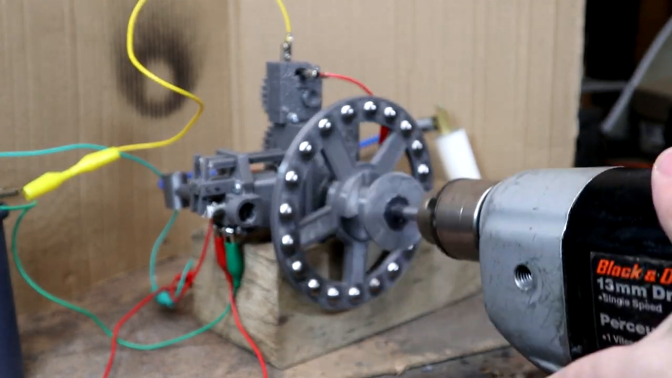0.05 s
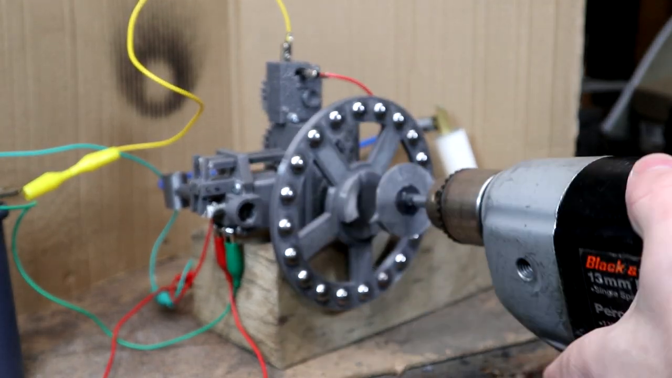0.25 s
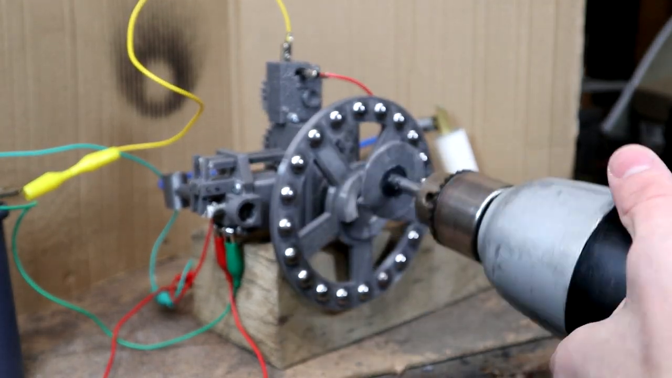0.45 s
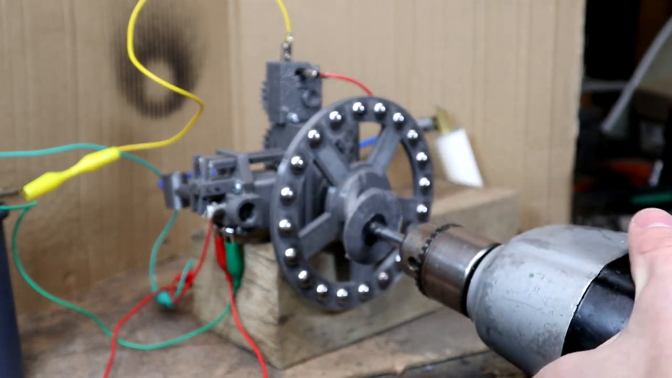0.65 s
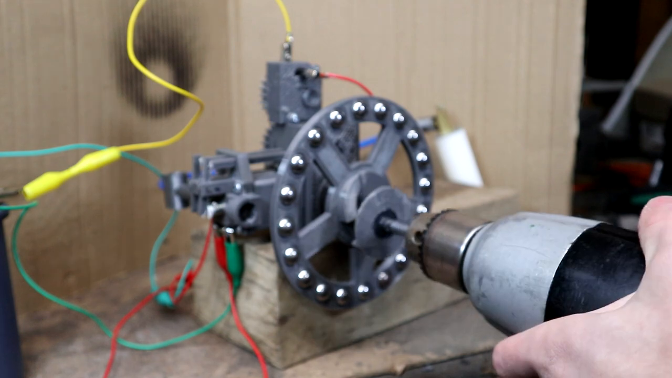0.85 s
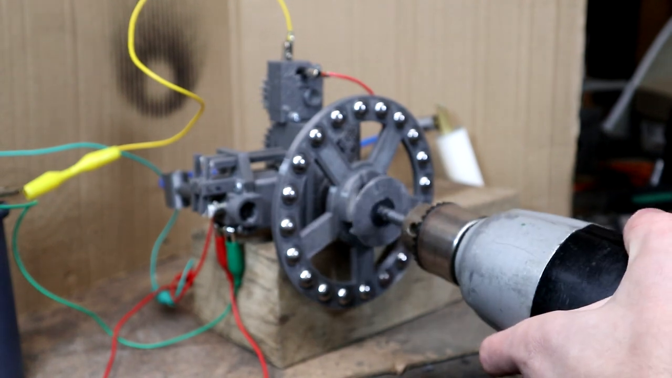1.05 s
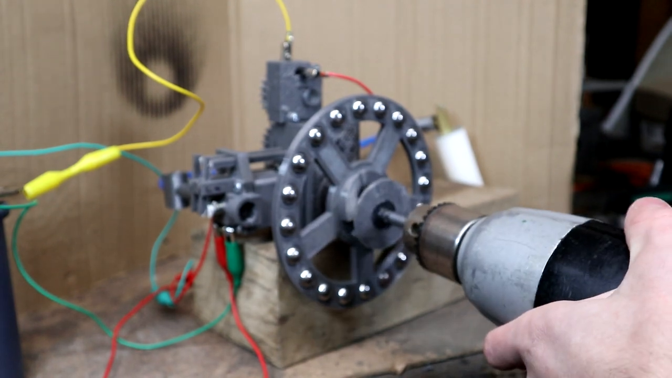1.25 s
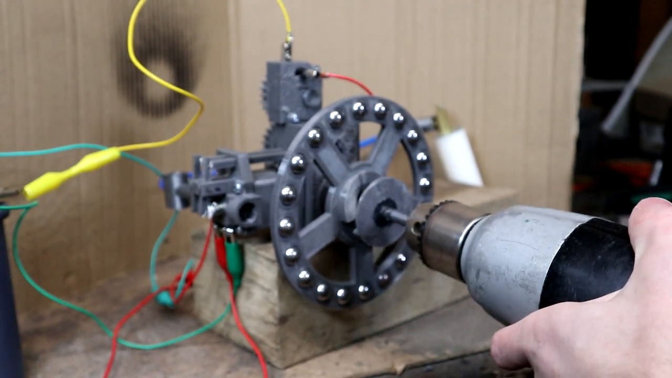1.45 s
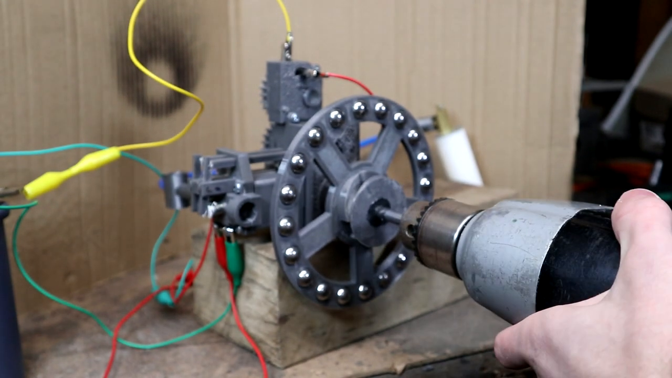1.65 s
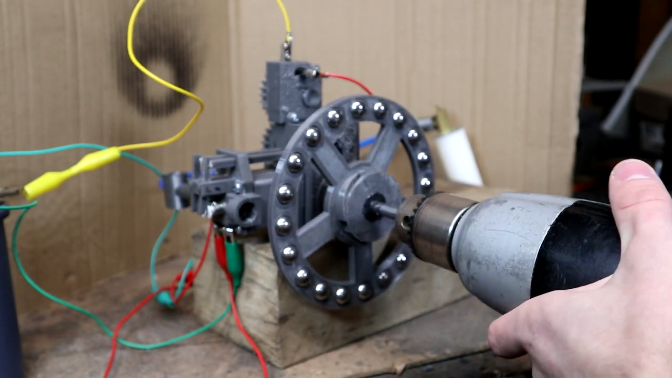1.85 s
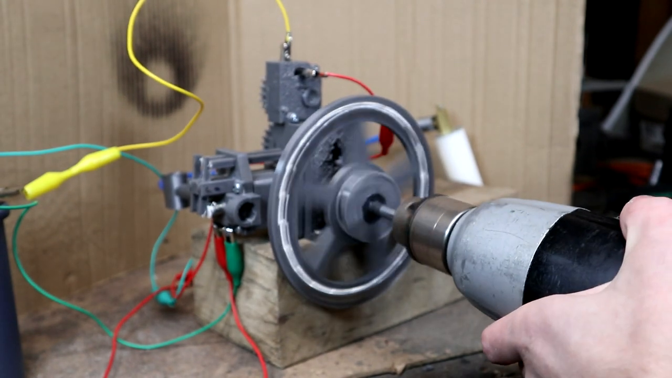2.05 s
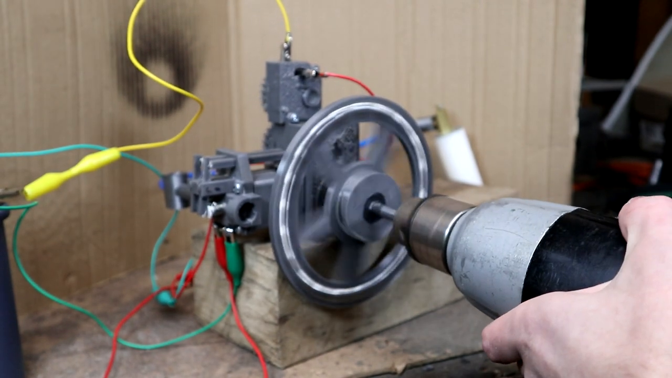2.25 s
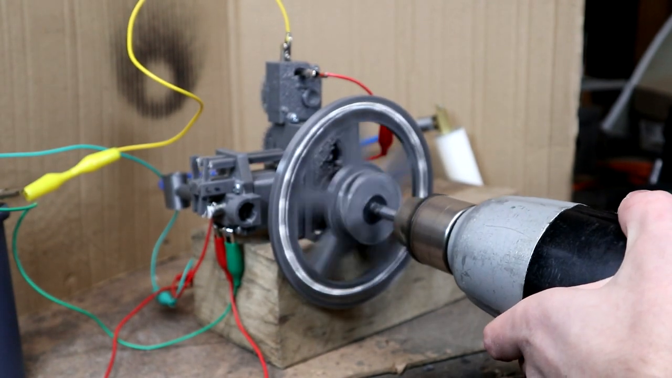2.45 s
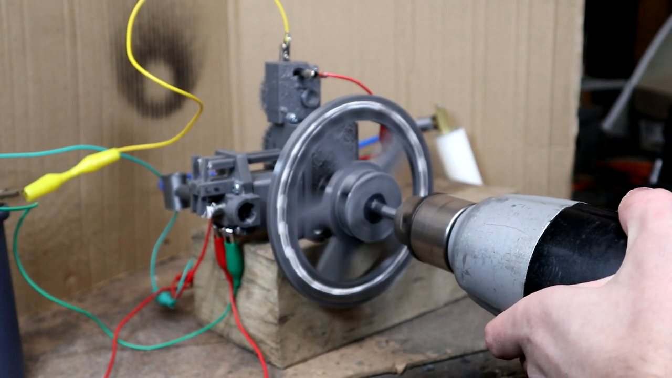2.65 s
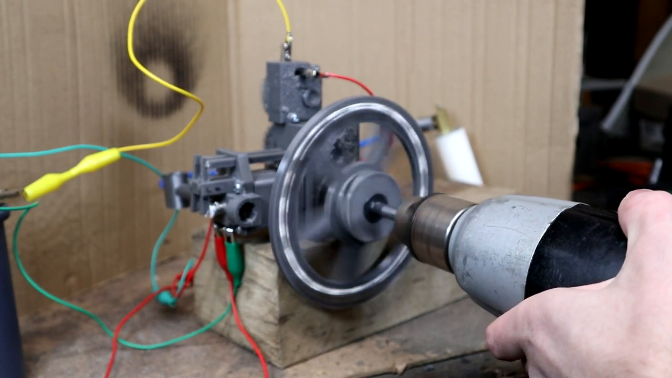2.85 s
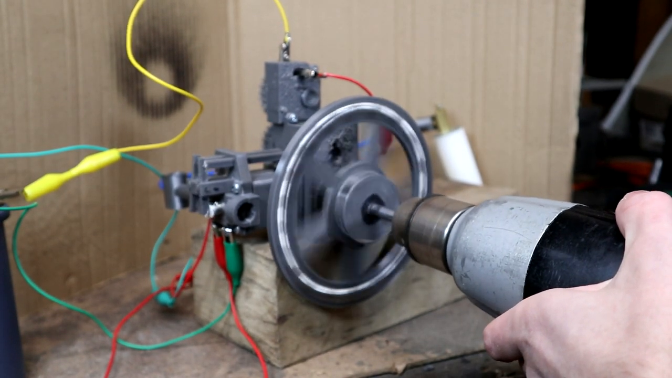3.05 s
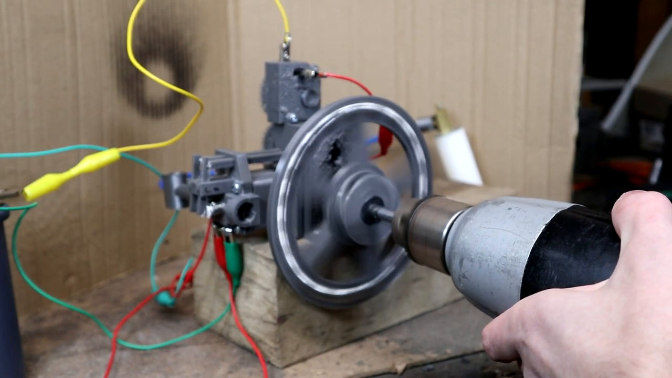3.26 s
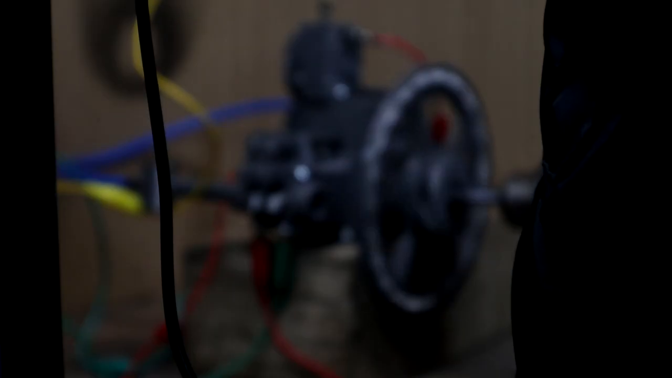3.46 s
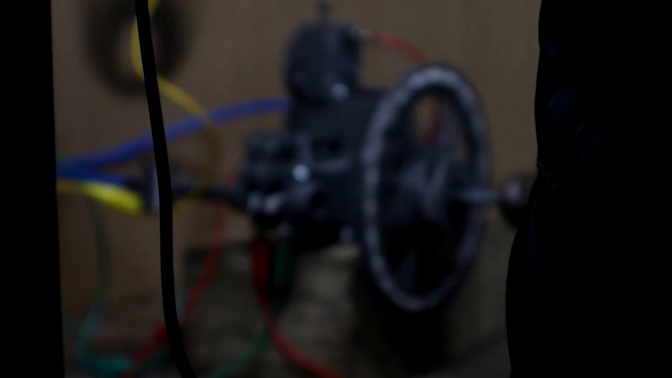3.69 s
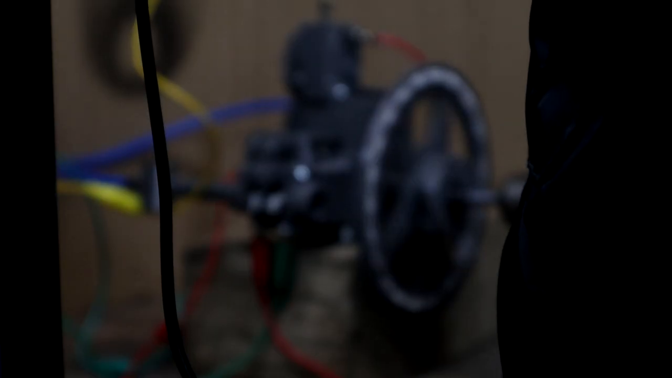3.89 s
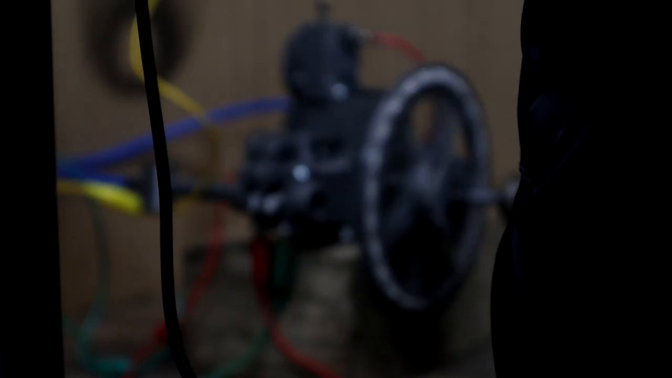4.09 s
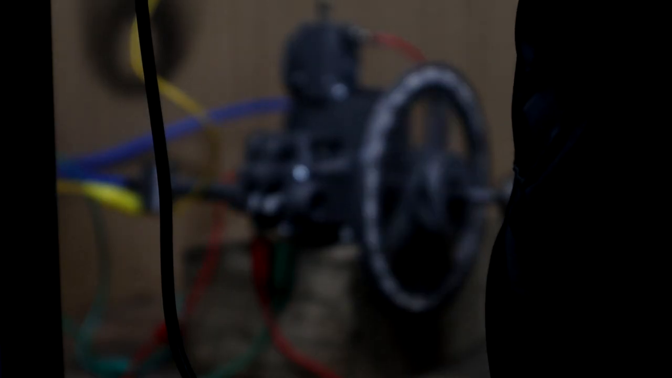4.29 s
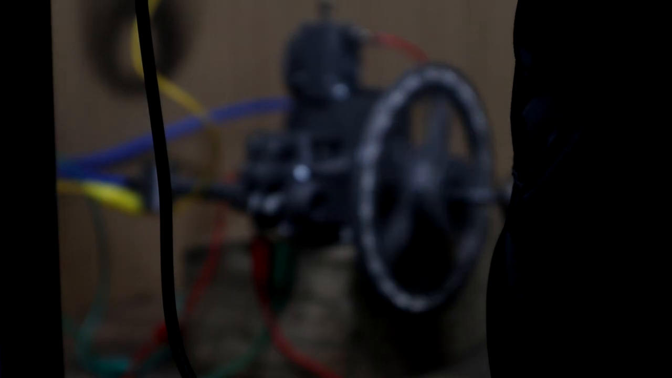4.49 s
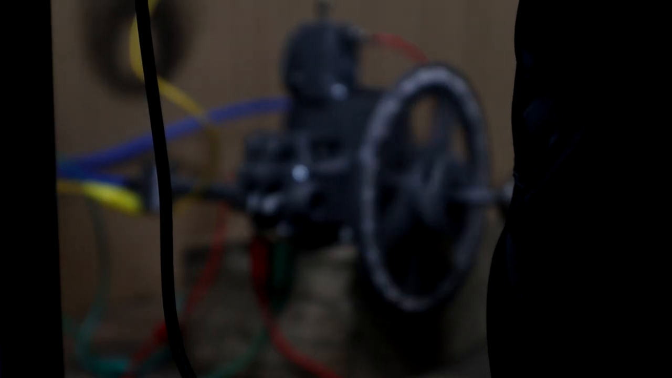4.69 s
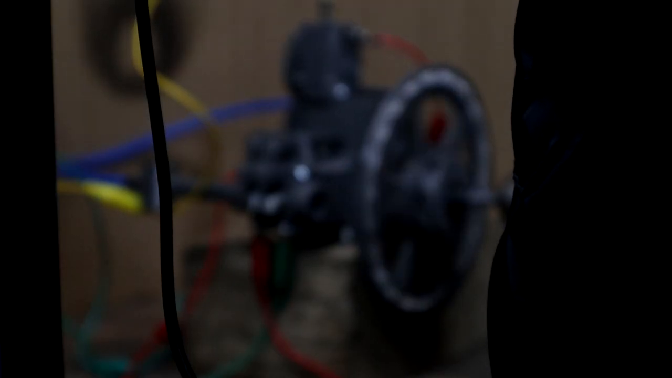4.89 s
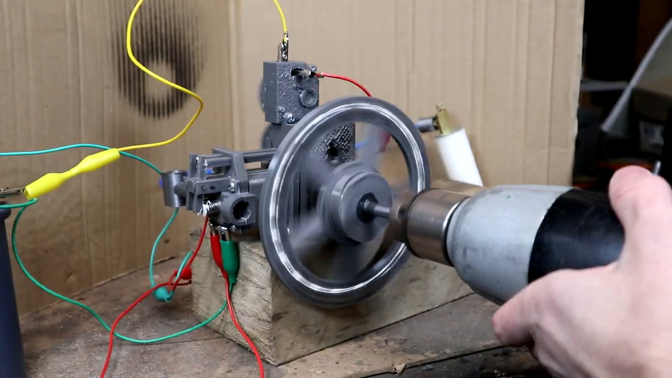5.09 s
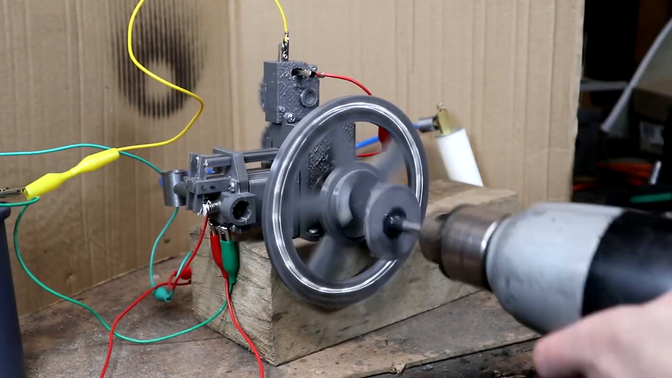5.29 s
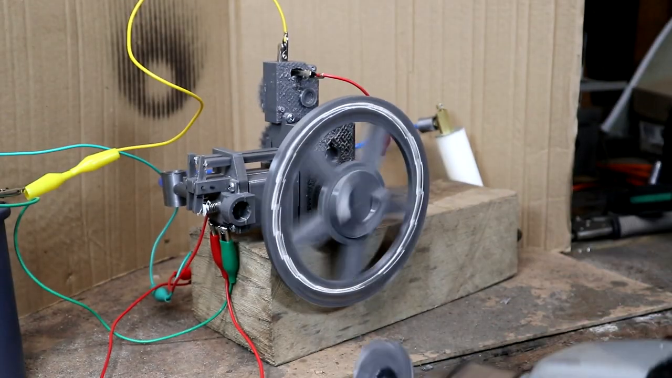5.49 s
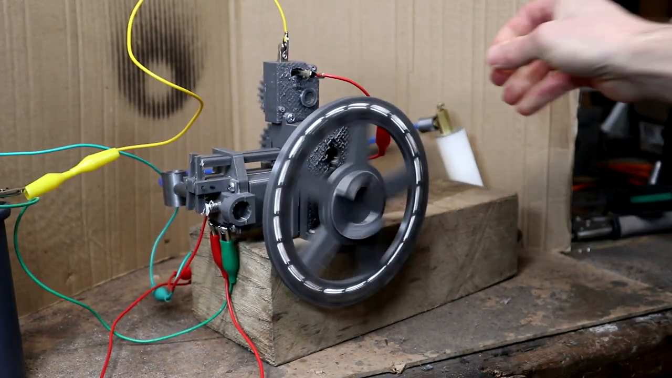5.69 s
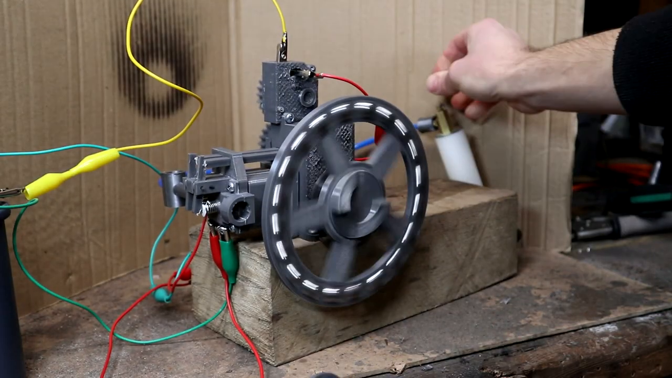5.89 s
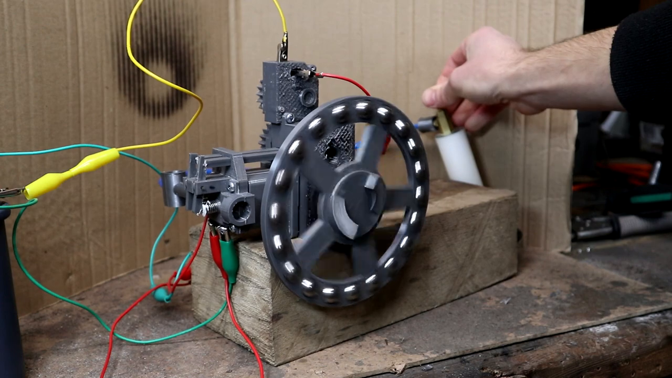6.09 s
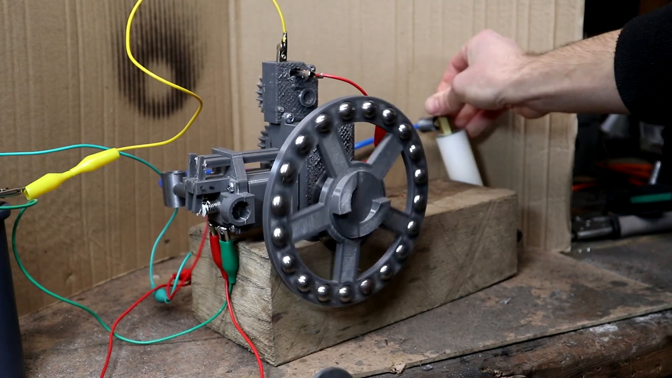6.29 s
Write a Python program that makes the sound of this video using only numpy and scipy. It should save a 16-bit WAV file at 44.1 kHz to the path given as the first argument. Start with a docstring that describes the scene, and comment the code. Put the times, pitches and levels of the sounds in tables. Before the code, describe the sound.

A power drill coasts down to a stop, pauses, then whines up to crank a small engine, heard close, then duller, then close and slowing.

```python
"""A hand drill coasts almost to rest, pauses, then spins up to crank a small model engine on a wooden block, and slows.
Gear teeth and commutator bars whine as sines at multiples of the shaft speed; knocks, rattle, grind and fan rush
are filtered noise that follows the speed. The microphone ports are near, but the middle stretch is heard from
farther off, where it is duller. Mains hum, a faint drone and whistle, room hush, small ticks and soft rubs and
rustles (the drill's last rub as it stops, then hands shifting) fill the workshop."""
import sys
import numpy as np
from scipy import signal
from scipy.fft import rfft, irfft, next_fast_len
from scipy.io import wavfile
from scipy.ndimage import map_coordinates

SR = 44100
rng = np.random.default_rng(int(sys.argv[2]) if len(sys.argv) > 2 else 0)


def natural_amplitude(level_db):
    """Convert a level in decibels to a linear amplitude factor, elementwise."""
    exponent = np.asarray(level_db, float) / 20
    return 10 ** exponent


def output_pcm(signal):
    """Save a mono or channel-first signal as 16-bit PCM at the path in sys.argv[1].

    Samples are clipped to [-1, 1] before scaling.
    """
    pcm = np.clip(np.atleast_2d(signal).T, -1, 1) * 32767
    wavfile.write(sys.argv[1], SR, np.round(pcm).astype(np.int16))


N = 279594
T = np.arange(N) / SR  # time [s]


def unit(x):
    """Scaled to rms 1."""
    return x / np.sqrt(np.mean(x ** 2) + 1e-20)


def along(points, hz, column=1):
    """A column of (frequency, ..) points read on a log frequency axis."""
    p = np.transpose(points)
    return np.interp(np.log(hz + 1), np.log(p[0] + 1), p[column])


def during(start, end, rise_s, fall_s):
    """1 between start and end, with a linear fade outside each."""
    return np.clip(np.minimum((T - start) / rise_s, (end - T) / fall_s) + 1, 0, 1)


def wobble(rate):
    """A smooth random curve, rate knots a second."""
    knots = rng.standard_normal(int(N * rate / SR) + 4)
    return map_coordinates(knots, [np.arange(N) * rate / SR])


def filtered(x, response):
    """x times a complex response of frequency."""
    m = next_fast_len(N + 8192)
    return irfft(rfft(x, m) * response(np.fft.rfftfreq(m, 1 / SR)), m)[..., :N]


def rings(modes, hz):
    """Causal sum of (frequency, width, level) resonances."""
    return sum(natural_amplitude(db) * 1j * hz * w / (c * c - hz * hz + 1j * hz * w) for c, w, db in modes)


def motor(start, end, first_hz, full_hz, let_go):
    """Whine base [Hz], speeding-up [10 kHz/s] and grip [0-1]: the rotor leaps, then drags the flywheel up; it coasts
    against air drag and dry friction."""
    quick_share, quick_s, slow_s = .681, .109, .34
    drag_per_s, friction_hz_per_s = .384, 669
    slack_s, bite_s = .028, .028
    driven_s = np.clip(T, start, let_go) - start
    coast_s = np.clip(T, let_go, end) - let_go
    lag = quick_share * np.exp(-driven_s / quick_s) + (1 - quick_share) * np.exp(-driven_s / slow_s)
    hz = full_hz - (full_hz - first_hz) * lag
    balance_hz = friction_hz_per_s / drag_per_s
    hz = (hz + balance_hz) * np.exp(-drag_per_s * coast_s) - balance_hz
    grip = np.clip((driven_s - slack_s) / bite_s, 0, 1) if first_hz == 0 else 1
    push = np.clip(np.gradient(hz) * SR / 1e4, 0, None)
    return hz, push, grip


# multiples of the whine base that sound: gear mesh, commutator, then three overtones
MULTIPLES = [2, 3, 4, 6, 8]
# phase unsteadiness of each whine [rad]
BLUR_RAD = [0.68, 0.4, 0.31, 0.87, .4]
# stretches of turning; the whine base is 4 times the shaft speed:
# (start [s], end [s], first whine base [Hz], full whine base [Hz], trigger let go [s])
RUNS = [(0, .6, 552, 552, .02), (2.018, 3.43, 0, 1607.5, 3.43), (3.44, 5.03, 1580, 1602, 5.03),
        (5.04, 6.34, 1628, 1613, 5.344)]
# base levels of each stretch, as the drill is heard there: (knock [dB], ring [dB], rattle [dB], grind [dB],
# rush [dB], gear mesh [dB], commutator [dB], overtones [dB])
HEARD = [(-56, -53.5, -30.5, -31, -37.5, -49, -29, -10.5), (-56.5, -49, -36, -34.5, -40.5, -37, -40, 2),
         (-66, -65.5, -45, -44.5, -49, -61, -40.5, -21), (-56.5, -48.5, -36, -34, -42, -39.5, -36, 1.5)]
# gear mesh strength over its own pitch: (frequency [Hz], level [dB])
MESH = [(450, -44), (600, -4.5), (740, -3), (850, -21.5), (1100, -17.5), (1400, -8.5), (1700, 1.5),
        (1950, -3.5), (2300, 5), (2900, -1), (3200, -0.5)]
# commutator strength over its own pitch: (frequency [Hz], level [dB])
BARS = [(800, -50), (1200, -25), (1650, -16.5), (2300, -10.5), (3000, -8), (3500, -5), (4200, -2),
        (4800, 0)]
# gain under acceleration: mesh, commutator [dB per 10 kHz/s]
CURRENT_DB = [3, 23]
# housing resonances lighting up each overtone: (frequency [Hz], width [Hz], level [dB])
LIT = [
    [(700, 170, -59.5), (2630, 570, -44.5), (3300, 230, -53), (6500, 550, -54.5)],
    [(2725, 700, -45), (3870, 400, -51), (6020, 320, -44), (6650, 230, -47)],
    [(2300, 500, -51), (6360, 730, -51)],
]
# the commutator swells in after each change of place: (time [s], level under [dB], time constant [s])
SWELL = [(3.439, 16, 0.17), (5.042, 19, 0.026)]


def whine():
    """Gear and commutator sines locked to the shaft, each unsteady in phase and strength; also the shaft angle."""
    out, shaft = np.zeros(N), np.zeros(N)
    swell_db = -sum((T >= s) * db * np.exp(-np.abs(T - s) / rise) for s, db, rise in SWELL)
    for run, (*_, mesh_db, bars_db, overtones_db) in zip(RUNS, HEARD):
        hz, push, grip = motor(*run)
        angle = 2 * np.pi * np.cumsum(hz) / SR
        on = during(*run[:2], 0.0013, 0.0024)
        shaft += on * angle / 4
        mesh = natural_amplitude(mesh_db + along(MESH, MULTIPLES[0] * hz) + CURRENT_DB[0] * push)
        bars = natural_amplitude(bars_db + along(BARS, MULTIPLES[1] * hz) + CURRENT_DB[1] * push + swell_db)
        settled = np.clip(2 - push / .3, 0, 1)  # teeth chatter and lose their overtones under hard acceleration
        gains = [mesh, bars]
        for k, modes in zip(MULTIPLES[2:], LIT):
            lit = sum(natural_amplitude(db) * np.exp(-2 * ((k * hz - c) / w) ** 2) for c, w, db in modes)
            gains.append(settled * natural_amplitude(overtones_db) * lit)
        for k, gain, blur in zip(MULTIPLES, gains, BLUR_RAD):
            flutter = 1 + .33 * wobble(35)
            drift = natural_amplitude(.6 * wobble(8) + 6 * push * wobble(70))  # rougher while speeding up
            phase = k * angle + blur * (wobble(60) + 2.1 * wobble(9))
            out += on * grip ** 4 * np.sqrt(2) * gain * drift * flutter * np.sin(phase)
    return out, shaft


# how knock, ring, rattle, grind and rush follow the whine base:
# (slope [dB per octave], dies below [Hz], gain under acceleration [dB per 10 kHz/s])
LAWS = [(1.5, 340, 13), (2.5, 140, -2), (11.5, 130, 11.5), (6.5, 90, 8.5), (4, 20, 1)]
# speeds that shake the block into ringing: (whine base [Hz], width [Hz], more ring [dB])
SHAKES = [(1090, 393, 12.5), (675, 300, 5.5), (200, 210, 3)]


def effort():
    """Gains of knock, ring, rattle, grind and rush: noise grows with speed and load and dies away at the end of
    each stretch."""
    full_hz, stop_db_per_s = 1600, 329
    free_fan_db = -21  # the fan already whirs while the teeth take up their slack
    gains = 0
    next_starts = [*np.transpose(RUNS)[0, 1:], N / SR + 1]
    for run, levels, until in zip(RUNS, HEARD, next_starts):
        hz, push, grip = motor(*run)
        hz = hz + 1
        db = np.array([full_db + slope * np.log2(hz / full_hz) - 20 * np.log10(1 + (dies_hz / hz) ** 4) + load_db * push
                       for full_db, (slope, dies_hz, load_db) in zip(levels, LAWS)])
        db[1] += sum(more_db * np.exp(-2 * ((hz - c) / w) ** 2) for c, w, more_db in SHAKES)
        after_s = np.clip(T - run[1], 0, None)
        drive = np.ones_like(db) * grip
        drive[-1] = np.maximum(drive[-1], natural_amplitude(free_fan_db))
        gains += during(run[0], until - .012, 0.01, 0.01) * drive * natural_amplitude(db - stop_db_per_s * after_s)
    return gains


def repeating(shaft, changes):
    """Surface flaws met once a turn: noise read by shaft angle, renewed `changes` times a second."""
    flaws = rng.standard_normal((int(N * changes / SR) + 4, 48))
    where = [np.arange(N) * changes / SR, shaft / (2 * np.pi) % 1 * flaws.shape[1]]
    return unit(map_coordinates(flaws, where, mode="grid-wrap"))


def contact(rate, db):
    """Two noises with one uneven strength, as of uneven contacts."""
    return rng.standard_normal((2, N)) * natural_amplitude(db * wobble(rate))


# housing and block: (frequency [Hz], width [Hz], level before mixing [dB])
BODY = [(596, 50, 8), (690, 48, -8.5), (1063, 30, 7.5), (1299, 40, 8), (1974, 27, -3), (2510, 110, -6),
        (3330, 73, -10.5)]


def body(hz):
    """Resonances of housing and block standing on a flat response."""
    return 1 + 0.37 * rings(BODY, hz)


# spectrum of the bench knocks: (frequency [Hz], relative level [dB])
KNOCK = [(29, -48.5), (50, -16.5), (129, -7), (192, -5.5), (340, -1), (440, -26), (750, -120)]
# the wooden block's strongest rings: (frequency [Hz], width [Hz], level before squaring [dB])
BLOCK = [(668, 99, 1), (549, 120, -4)]
# spectra of gear rattle, grind and fan rush, each near then far: (frequency [Hz], relative level [dB])
RATTLE = [
    [(190, -56), (330, -18.5), (389, -4.5), (595, -5.5), (646, -12), (762, 0), (843, -5.5), (1290, -1.5),
     (1500, -8), (1950, -34.5), (3300, -120)],
    [(190, -42), (330, -33), (394, -6), (541, -11.5), (626, -5.5), (827, 0.5), (927, -3.5), (1410, -9),
     (1500, -9.5), (1950, -27), (3300, -120)],
]
GRIND = [
    [(850, -44.5), (1450, 0.5), (1570, 1), (1730, 2.5), (2020, -0.5), (2130, 2.5), (2960, 4.5),
     (4600, -5.5), (5980, -14.5), (10100, -120)],
    [(850, -32), (1450, -6.5), (1800, 2.5), (2130, -5), (2450, -4.5), (3770, -6), (4430, -10), (4600, -39),
     (5980, -39), (10100, -120)],
]
RUSH = [
    [(2650, -30), (4500, -5.5), (6430, -2), (10500, -8), (11300, -11.5), (11700, -14), (11800, -27),
     (12300, -29.5), (16000, -72), (22000, -120)],
    [(2650, -49.5), (4500, -32), (4630, -10), (4960, -14), (5080, -12.5), (7000, -15), (8140, -21.5),
     (11200, -21.5), (12300, -31), (16000, -72), (22000, -120)],
]


def clatter(place, shaft):
    """Two unrelated draws of the noisy parts: knocks, block ring, rattle and grind in the body, air from the fan."""
    flaws = repeating(shaft, changes=45)
    each_turn = 1 + 0.071 * np.sin(shaft)
    knock = filtered(contact(30, 2.7), lambda hz: natural_amplitude(along(KNOCK, hz))) * natural_amplitude(1.7 * wobble(22))
    ring = filtered(contact(60, 2.0), lambda hz: rings(BLOCK, hz) ** 2)
    rattle = filtered(contact(400, 0.62) + 0.12 * flaws, lambda hz: natural_amplitude(along(RATTLE[place], hz)) * body(hz))
    grind = filtered(contact(600, 1.3) * each_turn + 0.3 * flaws,
                     lambda hz: natural_amplitude(along(GRIND[place], hz)) * body(hz))
    rush = filtered(contact(900, 1.24) * each_turn + 0.25 * flaws, lambda hz: natural_amplitude(along(RUSH[place], hz)))
    unsteady_db = [0.92 * wobble(6),
                   1.0 * wobble(9),
                   0.19 * wobble(17) + 0.72 * wobble(5.06),
                   0.31 * wobble(18) + 0.27 * wobble(6),
                   0.25 * wobble(11)]
    parts = [knock, ring, rattle, grind, rush]
    return sum(gain * natural_amplitude(db) * unit(x) for gain, db, x in zip(effort(), unsteady_db, parts))


# difference of the two microphone ports, near then far: (frequency [Hz], side over mid [dB])
APART = [
    [(60, -18.5), (120, -22), (220, -32.5), (440, -18), (840, -14), (1630, -11.5), (3160, -6.5),
     (6120, 0.5), (11800, 9)],
    [(60, -12), (120, 4), (220, -32), (440, -35), (840, -17.5), (1630, -17), (3160, -8.5), (6120, -1.5),
     (11800, 3.5)],
]
# part of that difference following the direct sound, near then far: (frequency [Hz], share [0-1], phase [rad])
DIRECT = [
    [(300, 0.7, -2), (1200, 0.9, -2.5), (3000, 0.6, -2), (6000, .6, -2), (11000, .6, -1.74)],
    [(300, 0.4, -2.5), (1200, 0.2, -12), (3400, 0, 2), (5860, 0, -0.3), (11000, .4, 2)],
]


def ports(tone, noise, place, tone_side_db):
    """Left and right ports: their difference is part phase-turned direct sound, part diffuse sound."""
    def share(hz):
        return np.clip(along(DIRECT[place], hz), 0, 1)

    def turn(hz):
        return natural_amplitude(along(APART[place], hz)) * np.exp(1j * along(DIRECT[place], hz, column=2))

    direct = filtered(noise[0], lambda hz: share(hz) * turn(hz))
    direct = direct + filtered(tone, turn) * natural_amplitude(tone_side_db)
    diffuse = filtered(noise[1], lambda hz: np.sqrt(1 - share(hz) ** 2) * turn(hz))
    mid, side = tone + noise[0], direct + diffuse
    return np.array([mid + side, mid - side])


# the listening place changes to far, then back to near: time [s]
SWAP_S = [3.432, 5.037]


def drill():
    """Whine and clatter from the near place, but far between the two changes; the drill dips out at each change."""
    tone, shaft = whine()
    inside = np.minimum(T - SWAP_S[0], SWAP_S[1] - T) / 0.007  # fade [s]
    near = ports(tone, clatter(0, shaft), 0, tone_side_db=1.5) * np.clip(-inside, 0, 1)
    far = ports(tone, clatter(1, shaft), 1, tone_side_db=-7.0) * np.clip(inside, 0, 1)
    return near + far


# mains hum, midway between the two ports: (time [s], level [dB])
HUM = [(0.0, -56), (0.33, -55), (0.94, -67), (1.77, -75.5), (2.05, -65), (2.9, -66), (3.23, -75),
       (3.49, -64), (5.76, -66), (6.11, -58), (6.34, -60)]


def mains_hum():
    """A sine at twice the mains frequency, unsteady in level and phase, slightly stronger on the left."""
    hum_hz = 120
    level_db = np.interp(T, *np.transpose(HUM)) + .8 * wobble(29)
    hum = np.sqrt(2) * natural_amplitude(level_db) * np.sin(2 * np.pi * hum_hz * T + .2 * wobble(7.3))
    return hum * natural_amplitude([[.6], [-.6]])


def drone_and_whistle():
    """A faint low drone and a thin fuzzy whistle: sines with wandering phase and level."""
    drone = natural_amplitude(-87 + 2.5 * wobble(37)) * np.sin(2 * np.pi * 203 * T + 0.87 * wobble(30))
    whistle = natural_amplitude(-93.5 + 5.0 * wobble(40)) * np.sin(2 * np.pi * 3960 * T + 1.2 * wobble(120))
    return drone + whistle * [[1.5], [.45]]


# soft rubs and rustles, the drill's last rub as it stops, then hands shifting:
# (time [s], soft rub level [dB], thin rustle level [dB])
RUBS = [(.65, -76, -71.5), (.78, -74, -75), (1.096, -76, -90), (1.2, -88, -99), (1.894, -78, -103)]


def rub_gains():
    """Gains of rub and rustle: each stroke swells fast and dies more slowly."""
    rise_db_per_s, fall_db_per_s = 250, 113
    return sum(natural_amplitude(np.c_[db] + np.minimum(rise_db_per_s * (T - s), fall_db_per_s * (s - T))) for s, *db in RUBS)


# spectrum of room hush and rub: (frequency [Hz], relative level [dB])
ROOM = [(15, -58), (25, -26.5), (59, -13.5), (121, -3), (174, -17.5), (3130, -34), (3950, -32),
        (4380, -37.5), (12000, -51), (15600, -86.5), (22000, -120)]


def hush_and_rubs():
    """Steady room noise that swells with each soft rub, plus a thin rustle of resonant noise."""
    rub, crinkle = rub_gains()
    a, b = unit(filtered(rng.standard_normal((2, N)), lambda hz: natural_amplitude(along(ROOM, hz))))
    wide = filtered(b, lambda hz: 1.3 * hz / (hz + 300))  # diffuse sound differs more between ports in the treble
    hush = (rub + natural_amplitude(-82.5)) * np.array([a + wide, a - wide])
    thin = [(3950, 1240, 3.0), (6900, 4500, 1.0)]  # (frequency [Hz], width [Hz], level before squaring [dB])
    rustle = unit(filtered(rng.standard_normal((2, N)), lambda hz: rings(thin, hz) ** 2))
    return hush + crinkle * rustle


def workshop():
    """Hum, drone, whistle, hush, rubs and rustles added together."""
    return mains_hum() + drone_and_whistle() + hush_and_rubs()


# small knocks of chuck and bit on the hub:
# (time [s], level before onset and panning [dB], frequency [Hz], decay by 60 dB [s], phase step per sample [rad])
TICKS = [(0.306, -47.5, 233, 0.18, 0.081), (0.323, -28.5, 2490, 0.032, 0.71),
         (0.576, -66, 424, 0.095, 0.06), (.6, -61, 620, 0.093, 0.071), (.624, -62, 3000, 0.024, 0.55),
         (1.209, -64, 1020, 0.064, .12), (1.235, -71, 1155, 0.13, 0.16), (1.378, -56.5, 1960, 0.025, 0.11),
         (1.428, -64.5, 2060, .08, 0.1), (1.535, -72, 2300, 0.035, .5), (1.614, -71, 2500, .03, .4),
         (1.893, -57, 210, 0.061, 0.043)]


def ticks():
    """Short decaying rings with a wandering phase, stronger on the right."""
    out, t = np.zeros(N + SR), np.arange(SR // 5) / SR
    for s, db, hz, t60, rough in TICKS:
        stray = np.cumsum(rough * rng.standard_normal(len(t)))
        onset = 1 - np.exp(-t / 0.0013)
        ring = natural_amplitude(db - 60 * t / t60) * np.sin(2 * np.pi * hz * t + stray)
        out[round(s * SR):][:len(t)] += ring * onset
    return out[:N] * natural_amplitude([[-2.6], [2.6]])


def scene():
    """Drill, workshop and ticks."""
    return drill() + workshop() + ticks()


def low_pass(x):
    """Removes everything above the highest recorded frequency."""
    return signal.sosfilt(signal.butter(12, 12440, fs=SR, output="sos"), x)


def record(dry):
    """The finished mix as it is stored."""
    return low_pass(dry)


dry = scene()
out = record(dry)
output_pcm(out)
```